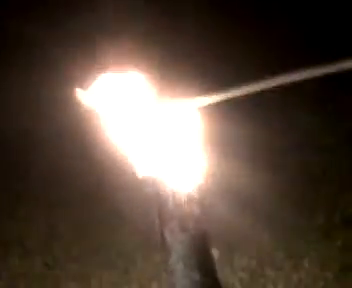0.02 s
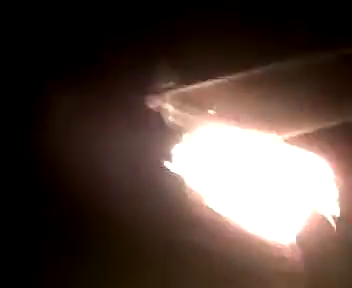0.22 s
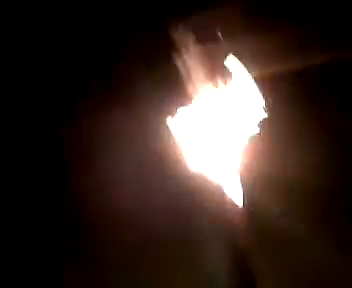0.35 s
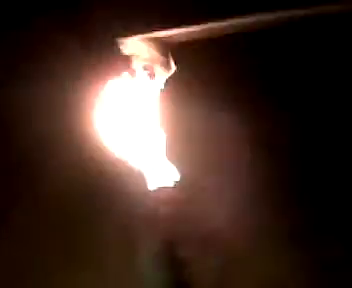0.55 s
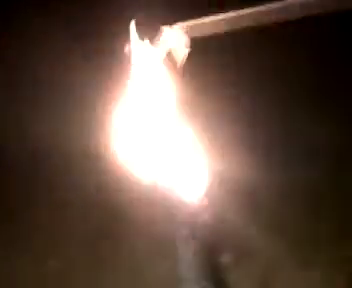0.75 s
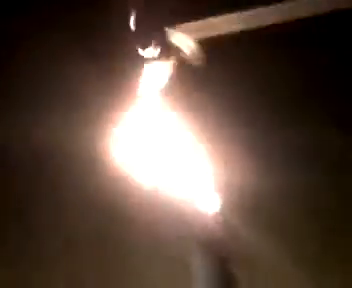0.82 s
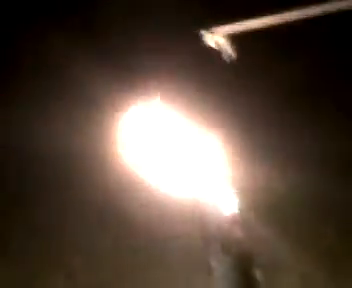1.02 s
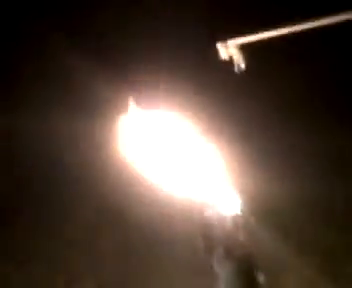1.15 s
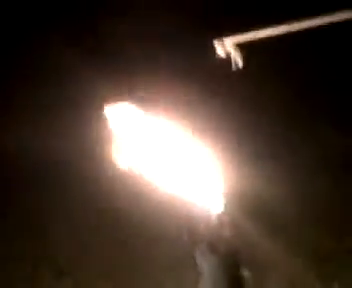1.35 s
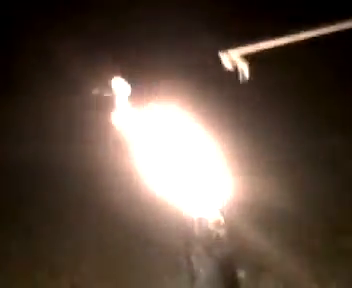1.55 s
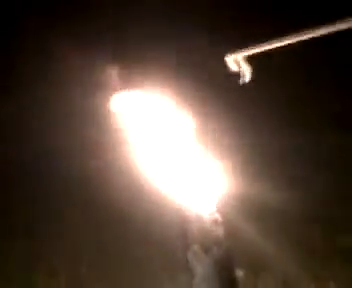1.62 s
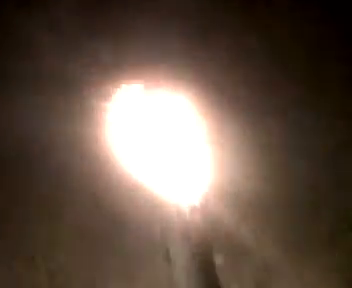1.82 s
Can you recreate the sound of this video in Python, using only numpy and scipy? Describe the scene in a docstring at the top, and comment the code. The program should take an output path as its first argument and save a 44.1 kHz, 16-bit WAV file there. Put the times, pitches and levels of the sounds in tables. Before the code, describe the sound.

One loud, slightly distorted bang comes from a gas balloon igniting close to the microphone in the open air. It echoes briefly off nearby walls and faintly from far away, leaving a torch flame softly fluttering and ticking.

```python
"""Gas balloon exploding over a torch

A gas-filled balloon explodes over a torch flame, outdoors at night. The shock wave overloads a small
microphone close by. Walls and scattered objects reflect it for a quarter of a second, and a hollow
echo returns from far away. The turbulent flame burns on with a soft, fluttering rush, fine crackle
and a few ticks, over the faint rumble of the night air."""
import sys
import numpy as np
from scipy import signal
from scipy.fft import rfft, irfft
from scipy.io import wavfile
from scipy.ndimage import uniform_filter1d

SR = 44100
rng = np.random.default_rng(int(sys.argv[2]) if len(sys.argv) > 2 else 0)


def generate_wav(signal):
    """Clip the signal to [-1, 1] and save it as 16-bit WAV at the path in sys.argv[1]."""
    frames = np.transpose(np.atleast_2d(signal))
    scaled = np.clip(frames, -1, 1) * 32767
    pcm = np.round(scaled).astype(np.int16)
    wavfile.write(sys.argv[1], SR, pcm)


N = 83790
T = np.arange(N) / SR
BANG_S, OVERPRESSURE_S = .2221, .0007

# Roar of burning gas behind the shock front: frequency_hz, density_db
ROAR_SPECTRUM = [(30, -20), (100, -15), (240, -3), (750, 0), (1200, -5), (1600, 0), (2400, -1), (2900, -15),
                 (3700, -19), (5400, -28), (8000, -62)]
# Bright crack of the first milliseconds: frequency_hz, density_db
CRACK_SPECTRUM = [(300, -17), (1500, -5.5), (2400, 15.5), (2900, -10.5), (3600, 4), (4700, -19),
                  (5500, -4.5), (6500, -15.5), (8000, -45)]
# Diffuse reflections from the ground and surroundings: frequency_hz, density_db
REVERB_SPECTRUM = [(30, -37), (70, -13.5), (150, -0.5), (260, 5), (500, -2), (900, -5), (2000, -3.5),
                   (2650, -12), (3050, -19), (3450, -24.5), (4200, -20), (4800, -30.5), (5500, -31.5),
                   (6500, -48), (8000, -86)]
# Their growth, slowest in the bass: frequency_hz, build_up_s
REVERB_BUILD = [(100, 0.66), (250, 0.19), (450, 0.037), (700, 0.017), (1200, 0.097), (2500, 0.17),
                (4000, .02)]
# Their decay: frequency_hz, t60_s
REVERB_DECAY = [(60, 1), (220, 0.49), (800, .36), (2000, 0.53), (5000, 0.55)]
# Slaps from the ground and flat walls: start_s, peak_db, low_edge_hz, high_edge_hz
WALL_SLAPS = [(.2262, -11, 172, 652), (.2309, -13, 280, 900), (.2485, -12.5, 350, 880),
              (.2519, -11, 220, 580), (.2987, -19, 900, 2300), (.3031, -11.5, 613, 1370),
              (.3066, -16, 696, 1200), (.3105, -12.5, 700, 1310), (.3470, -36, 900, 2600),
              (.3543, -24, 300, 900), (.3812, -23.5, 230, 700), (.3828, -8.5, 1100, 1790),
              (.4170, -23.5, 700, 1790), (.4184, -3, 600, 1800), (.4191, -22.5, 2000, 4300),
              (.5585, -38.5, 200, 910)]
# Low thuds among the later wall echoes: start_s, envelope_peak_db, pitch_hz
WALL_THUDS = [(0.2966, -14.5, 430), (0.3374, -31, 248), (0.3527, -15.5, 459), (0.3802, -11.5, 277.5),
              (.4175, -21.5, 178.4)]
# Echoes from rough groups of objects: start_s, level_db, rise_s, t60_s, high_edge_hz
SCATTERED_ECHOES = [(.243, -13.5, 0.002, 0.037, 1210), (0.294, -20.5, 0.0065, 0.19, 1980),
                    (0.339, -25, 0.0059, 0.053, 2300), (.378, -22.5, 0.0063, 0.033, 1990),
                    (0.437, -33.5, 0.0036, 0.053, 2350), (0.602, -55.5, .012, 0.045, 3500)]
# Their shared colour: frequency_hz, density_db
SCATTER_SPECTRUM = [(40, -17.5), (150, -20.5), (280, -3), (750, 7), (1100, -5), (2400, 0), (3200, -20),
                    (4300, -2), (8000, -45)]
# Echoes from far away: start_s, level_db, rise_s, t60_s
DISTANT_ECHOES = [(.841, -53.5, 0.00071, 0.11), (0.853, -53.5, 0.0033, 0.28), (0.867, -54.5, 0.0081, 0.028),
                  (0.889, -71, 0.0049, 0.053), (.935, -60, 0.02, .4)]
# Their hollow colour: frequency_hz, density_db
DISTANT_SPECTRUM = [(100, -16), (200, -4), (500, -20), (700, -6), (820, 4), (980, -1), (1150, -27),
                    (1450, -11), (1800, -19), (2300, -9.5), (3000, -21.5), (6000, -48)]
# Rush of the flame: frequency_hz, density_db
FLAME_SPECTRUM = [(25, -22), (60, -10.5), (130, -1.5), (300, 3), (520, -3.5), (950, 0), (1500, -6.5),
                  (2250, -4.5), (3000, -21), (4000, -29), (5000, -34), (7000, -42), (8000, -64.5)]
# Strength of the flame: time_s, gain_db
FLAME_GAIN = [(.5, -60), (.6, -69.5), (.76, -69), (1.02, -67), (1.08, -56), (1.13, -59.5), (1.165, -56),
              (1.22, -61), (1.3, -62.5), (1.39, -59), (1.455, -62.5), (1.485, -58), (1.6, -58), (1.8, -56),
              (1.9, -60.5)]
# Brightness of the rush: time_s, tilt_db_per_octave
FLAME_BRIGHTNESS = [(.7, 5.5), (.95, 1.5), (1.1, 0.14), (1.55, 0), (1.7, -1.5), (1.9, -2.5)]
# Ticks and spits of the flame: start_s, peak_db, low_edge_hz, high_edge_hz
FLAME_TICKS = [(.117, -53, 1800, 3420), (.162, -51, 2800, 3340), (.7803, -51, 148, 950),
               (.7818, -44.5, 500, 2610), (.8025, -48, 200, 540), (.814, -51, 120, 2400),
               (1.124, -70, 2000, 3300), (1.149, -44.5, 251, 2140), (1.168, -47.5, 600, 2800),
               (1.39, -49, 400, 1010), (1.48, -47, 1500, 2800)]
# Fine crackle of the flame: frequency_hz, density_db
CRACKLE_SPECTRUM = [(200, -28), (1000, -6), (2200, 0.5), (3000, -12), (4000, 1.5), (4600, -28.5),
                    (7000, -45.5)]
# Rumble and hiss of the night air: frequency_hz, density_db
AIR_SPECTRUM = [(15, -10), (35, -5), (70, -1), (125, 0), (200, -3), (400, -5), (700, -10), (1400, -13),
                (2300, -15), (3000, -19), (3700, -20), (5000, -30), (6500, -39), (8000, -47)]


def blast():
    """A blast wave: pressure jumps, then decays into suction, trailed by a crack and the gas's roar."""
    age = np.maximum(T - BANG_S, 0)
    scaled_age = age / OVERPRESSURE_S
    front = (age > 0) * (1 - scaled_age) * np.exp(-scaled_age)
    roar = amp(-15) * decay(age - .0044, t60_s=.084) * dense_noise(ROAR_SPECTRUM)
    crack_fade = np.exp(-np.maximum(age - .004, 0) / .0012)
    crack = amp(-18.5) * crack_fade * dense_noise(CRACK_SPECTRUM)
    behind_front = np.clip(2 * scaled_age - 1, 0, 1)
    return behind_front * (roar + crack) - front  # overpressure is negative in the signal


def reverberation(hold_s=.19, drop_db=-2.5, drop_s=.03):
    """Diffuse reflection: energy builds up as small echoes arrive, then each band decays at its rate."""
    grain = amp(-.5 * drift(.0033))
    hz, t, bands = signal.stft(dense_noise(REVERB_SPECTRUM), SR, nperseg=256)
    age = t - BANG_S
    late_s = np.maximum(age - hold_s, 0)
    build = np.sqrt(np.clip(age / at_frequency(REVERB_BUILD, hz)[:, None], 0, 1))
    fall = decay(late_s, at_frequency(REVERB_DECAY, hz)[:, None])
    drop = amp(drop_db * np.minimum(late_s / drop_s, 1))
    wash = signal.istft(bands * build * fall * drop, SR, nperseg=256)[1][:N]
    return amp(-25.5) * (T > BANG_S) * grain * wash


def wall_echoes(rise_cycles=.6):
    """Specular reflection: flat surfaces return the shock as sharp slaps and a few low thuds."""
    out = pulses(WALL_SLAPS)
    for start_s, peak_db, pitch_hz in WALL_THUDS:
        cycles = np.maximum(T - start_s, 0) * pitch_hz
        scaled_age = cycles / rise_cycles
        envelope = scaled_age * np.exp(1 - scaled_age)
        out += amp(peak_db) * envelope * np.sin(2 * np.pi * cycles)
    return out


def scattered_echoes():
    """Scattering: rough groups of objects smear the shock into short bursts of noise."""
    return sum(amp(level_db) * swell(start_s, rise_s, t60_s) * dense_noise(SCATTER_SPECTRUM, edge_hz)
               for start_s, level_db, rise_s, t60_s, edge_hz in SCATTERED_ECHOES)


def distant_echoes():
    """Propagation delay and spreading: the hollow echoes from far away arrive late and weak."""
    return sum(amp(level_db) * swell(start_s, rise_s, t60_s) * dense_noise(DISTANT_SPECTRUM)
               for start_s, level_db, rise_s, t60_s in DISTANT_ECHOES)


def flame_rush(strength, flutter_db=1.9, patch_db=.5):
    """Turbulent combustion radiates broadband noise that swells, flutters and shifts in brightness."""
    hz, t, bands = signal.stft(dense_noise(FLAME_SPECTRUM), SR, nperseg=512, noverlap=384)
    patches = uniform_filter1d(rng.standard_normal(bands.shape), size=10, axis=1)  # smooth in time
    patches = unit(uniform_filter1d(patches, size=7, axis=0))  # and across frequency
    octaves = np.log2(np.clip(hz, 200, 3000) / 700)[:, None]
    tilt_db = octaves * np.interp(t, *np.transpose(FLAME_BRIGHTNESS))
    bands = bands * amp(patch_db * patches + tilt_db)
    rush = signal.istft(bands, SR, nperseg=512, noverlap=384)[1][:N]
    return rush * strength * amp(flutter_db * drift(.0059))


def flame_crackle(strength, pops_per_s=130):
    """Shot noise: tiny independent pops of uneven size, scaled by the strength of the flame."""
    size_db = np.minimum(rng.exponential(1, N), 3)
    signs = rng.choice([-1., 1.], N)
    pops = amp(size_db) * signs * (rng.random(N) < pops_per_s / SR)
    return amp(-20.5) * strength * coloured(pops, CRACKLE_SPECTRUM)


def night_air():
    """Ambient noise: a steady low rumble with a faint hiss."""
    return amp(-65) * dense_noise(AIR_SPECTRUM)


def pulses(rows):
    """Impulse responses: single pressure pulses, each ringing briefly within its own band."""
    out = np.zeros(N)
    for start_s, peak_db, low_hz, high_hz in rows:
        pulse = signal.unit_impulse(SR // 20)
        pulse = signal.sosfilt(signal.butter(2, low_hz, "high", fs=SR, output="sos"), pulse)
        pulse = signal.sosfilt(signal.butter(5, high_hz, fs=SR, output="sos"), pulse)
        span = out[round(start_s * SR):][:len(pulse)]
        span -= amp(peak_db) * pulse[:len(span)] / abs(pulse).max()
    return out


def dense_noise(spectrum, edge_hz=None, slot_samples=6):
    """Superposition: equal impulses of random sign, one in each time slot, merge into coloured noise."""
    slots = np.arange(0, N - slot_samples, slot_samples)
    impulses = np.zeros(N)
    impulses[slots + rng.integers(0, slot_samples, len(slots))] = rng.choice([-1., 1.], len(slots))
    return coloured(impulses, spectrum, edge_hz)


def coloured(source, spectrum, edge_hz=None):
    """Linear filtering imposes a spectrum and an optional treble roll-off; the result has rms 1."""
    hz = np.fft.rfftfreq(N, 1 / SR)
    roll_off = 1 if edge_hz is None else 1 / np.hypot(1, np.square(hz / edge_hz))
    return unit(irfft(rfft(source) * amp(at_frequency(spectrum, hz)) * roll_off, N))


def drift(smoothing_s):
    """Moving averages turn white noise into a random drift of rms 1."""
    size = round(smoothing_s * SR)
    return unit(uniform_filter1d(uniform_filter1d(rng.standard_normal(N), size), size))


def swell(start_s, rise_s, t60_s):
    """A transient envelope: linear rise, then exponential decay."""
    age = T - start_s
    return np.clip(age / rise_s, 0, 1) * decay(age - rise_s, t60_s)


def decay(age_s, t60_s):
    """Exponential decay from age zero, by 60 dB in each t60_s."""
    return np.exp(-np.log(1000) * np.maximum(age_s, 0) / t60_s)


def at_frequency(table, hz):
    """Interpolation on a logarithmic frequency axis."""
    table_hz, values = np.transpose(table)
    return np.interp(np.log(hz + 1), np.log(table_hz + 1), values)


def amp(db):
    """Amplitude ratio of a level in decibels."""
    return 10 ** (np.asarray(db) / 20)


def unit(x):
    """Normalisation to rms 1."""
    return x / np.sqrt(np.mean(x ** 2) + 1e-20)


def scene():
    """Superposition: the pressures of blast, echoes, flame and air add in one channel."""
    echoes = reverberation() + wall_echoes() + scattered_echoes() + distant_echoes()
    strength = (T > BANG_S) * amp(np.interp(T, *np.transpose(FLAME_GAIN)))
    flame = flame_rush(strength) + flame_crackle(strength) + pulses(FLAME_TICKS)
    return (blast() + echoes + flame + night_air())[None]


def record(dry):
    """Overload: the microphone clips the highest peaks, and a steep low-pass limits the band."""
    overload, edge_hz = .66, 8100
    clipped = np.clip(dry, -overload, overload)
    low_pass = signal.firwin(401, edge_hz, window=("kaiser", 8), fs=SR)
    return signal.oaconvolve(clipped, low_pass[None], "same")


dry = scene()
out = record(dry)
generate_wav(out)
```